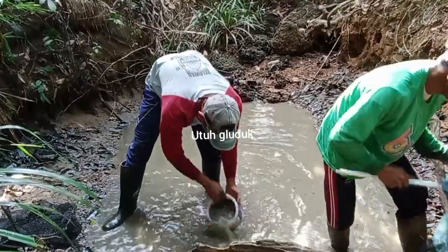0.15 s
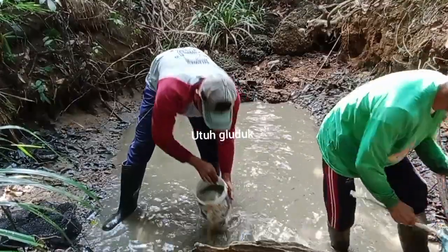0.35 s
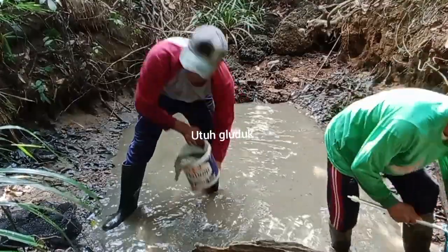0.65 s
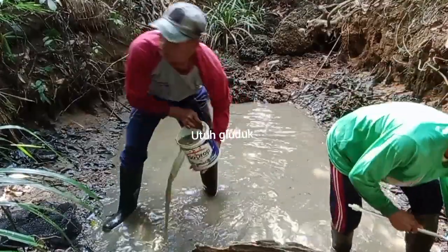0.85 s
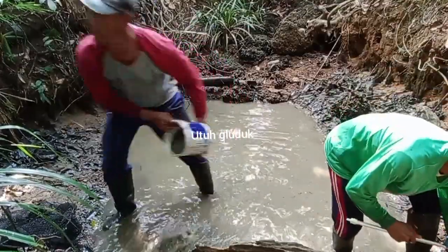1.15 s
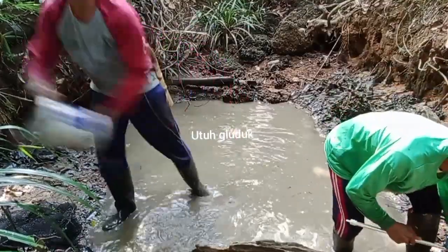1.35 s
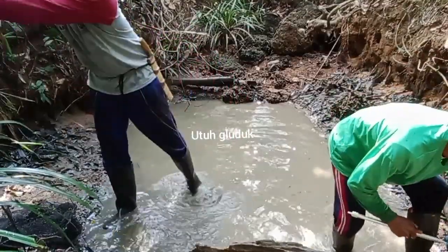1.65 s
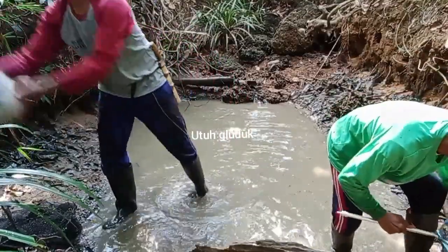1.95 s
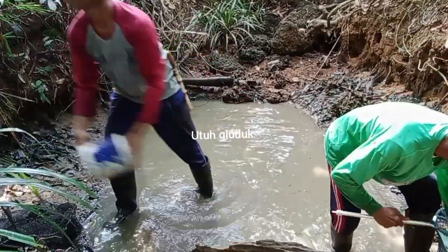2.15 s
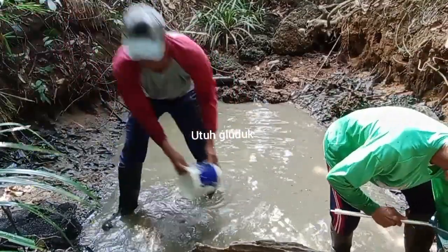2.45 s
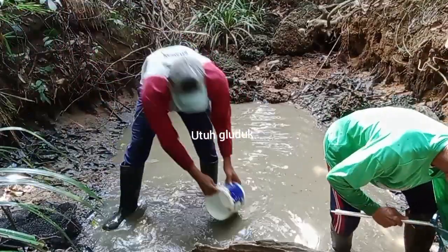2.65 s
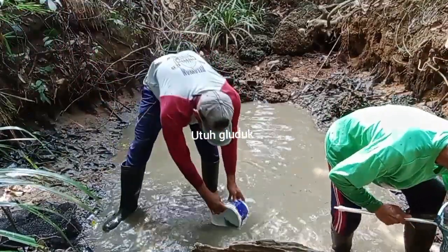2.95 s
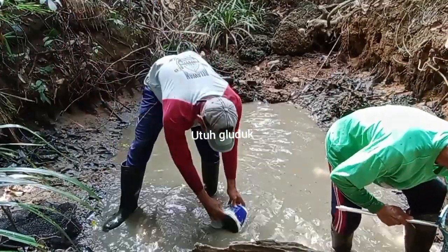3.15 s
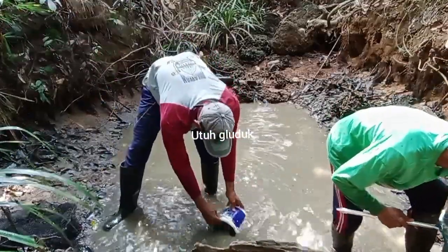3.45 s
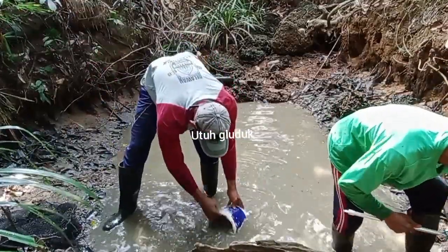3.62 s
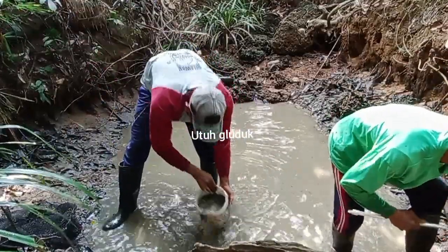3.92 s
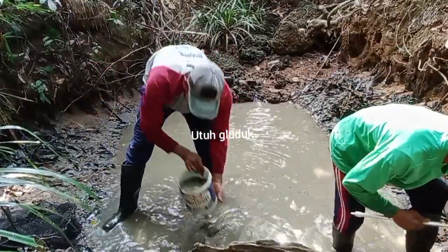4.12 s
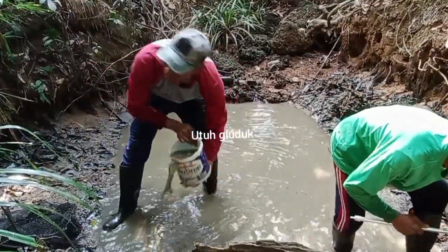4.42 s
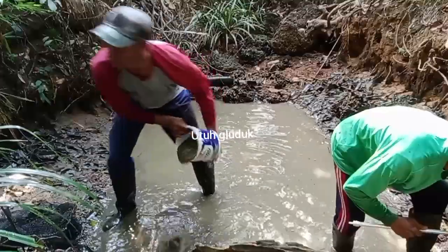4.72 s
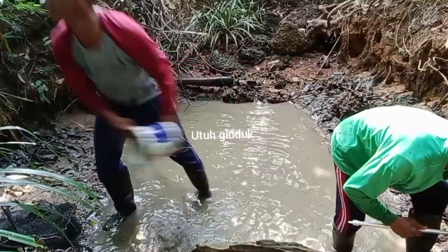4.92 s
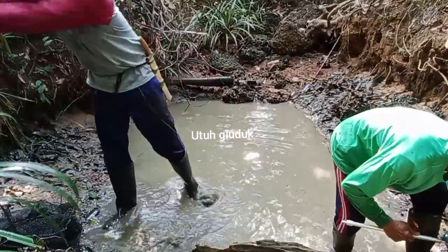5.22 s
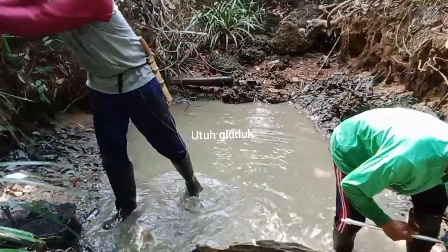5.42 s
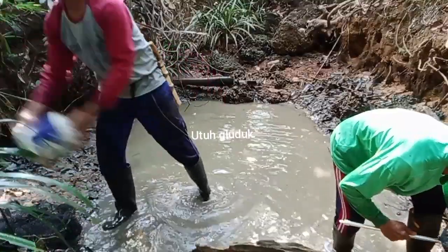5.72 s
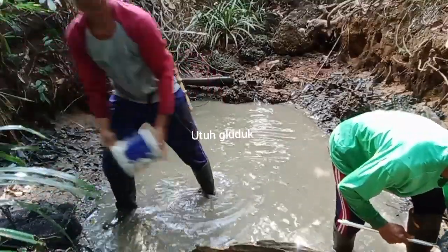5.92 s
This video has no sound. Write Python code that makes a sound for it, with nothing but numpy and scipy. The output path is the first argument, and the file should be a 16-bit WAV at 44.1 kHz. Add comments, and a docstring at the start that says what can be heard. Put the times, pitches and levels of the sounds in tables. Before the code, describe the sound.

Outdoor bailing of a shallow muddy pool: bubbling bucket scoops, dripping spills, a boot's slosh and two sharp, wet throws, ending with a dull plastic knock.

```python
"""In a dry stream bed, muddy water is bailed from a shallow pool with a small plastic bucket.
The bucket gulps air bubbles as it fills, spills and dribbles as it is lifted, and its load is
flung onto the wet bank, twice; a boot washes through the pool before the first throw. Splashes are
bubbles and drop impacts shaped by loudness curves; plops are gliding tones, short impacts are clicks
with noise bursts, and knocks are a few short tones. Insects hiss far off as a narrow band of noise."""
import sys
import numpy as np
from scipy import signal
from scipy.fft import rfft, irfft, next_fast_len
from scipy.io import wavfile
from scipy.ndimage import uniform_filter1d

SR = 44100
rng = np.random.default_rng(int(sys.argv[2]) if len(sys.argv) > 2 else 0)


def master_out(mix):
    """Clip the mix to full scale and print it as 16-bit PCM to the path in sys.argv[1]."""
    frames = np.transpose(np.atleast_2d(mix))
    ceiling = np.clip(frames, -1, 1)
    pcm = np.round(ceiling * 32767).astype(np.int16)
    wavfile.write(sys.argv[1], SR, pcm)


N = 267687
TIME = np.arange(N) / SR  # seconds

# tone of the boot's wash and of the flung water: [f/Hz, level/dB]
SPLASH_TONE = [(47, -26), (80, -15), (161, -10.5), (219, -20), (298, -5.5), (451, -7), (1320, 4.5),
               (2280, 4.5), (6820, -8), (8680, -15), (12300, -25), (13700, -29), (15000, -52)]
# tone of drops hitting the pool: [f/Hz, level/dB]
POOL_TONE = [(88, -66), (150, -16), (486, -3.5), (589, -1.5), (661, -1.5), (1030, -2.5), (1490, 5.5),
             (3030, -3.5), (6550, -14), (8920, -22), (9820, -25.5), (13900, -36), (15000, -70)]


def from_db(db):
    """Turn decibels into a plain gain."""
    return 10 ** (np.asarray(db) / 20)


def rms_one(x):
    """Scale a sound to an average power of one."""
    return x / np.sqrt(np.mean(x ** 2) + 1e-20)


def add(out, s, sound):
    """Mix a short sound in at time s, in seconds."""
    i = int(np.clip(round(s * SR), 0, N - 1))
    out[i:i + len(sound)] += sound[:N - i]


def colour(x, spectrum):
    """Make each pitch region louder or softer, following a table of frequencies and levels."""
    hz, db = np.transpose(spectrum)
    size = next_fast_len(N + 4096)
    bins = np.maximum(np.fft.rfftfreq(size, 1 / SR), 1)
    gain = from_db(np.interp(np.log(bins), np.log(hz), db))
    return irfft(rfft(x, size) * gain, size)[:N]


def band(x, low_hz, high_hz, order=2):
    """Keep mainly the sound between two frequencies."""
    edges = [low_hz, min(high_hz, .45 * SR)]
    sos = signal.butter(order, edges, "band", fs=SR, output="sos")
    return signal.sosfilt(sos, x + 1e-18)


def even(x, span_s):
    """Hold the power near one over span_s, keeping the finer grain."""
    size = max(int(span_s * SR), 2)
    power = np.abs(uniform_filter1d(uniform_filter1d(x ** 2, size), size))
    return x / np.sqrt(power + 1e-4 * np.mean(x ** 2))


def smooth_noise(cutoff_hz, noise):
    """Keep only the slow part of some noise."""
    return signal.sosfilt(signal.butter(2, cutoff_hz, fs=SR, output="sos"), noise)


def waver(rate, depth_db):
    """A gain that wanders at random about 0 dB, slower than about rate in Hz."""
    slow = smooth_noise(rate, rng.standard_normal(N + SR))[SR:]  # skip the filter's start
    return from_db(depth_db * rms_one(slow))


def surge(s, rise_s, hold_s, fade_s):
    """The loudness of a mass of water that arrives, keeps coming for a while and dies away."""
    fade_curve = 1.46  # above 1, the last of the water stops sooner than a plain decay would
    out = np.zeros(N)
    during = (TIME >= s) & (TIME < s + rise_s + hold_s + 10 * fade_s)
    t = TIME[during] - s
    swell = np.sin(np.pi / 2 * np.clip(t / max(rise_s, 1e-3), 0, 1)) ** 2
    fading = np.maximum((t - rise_s - hold_s) / max(fade_s, 1e-3), 0)
    out[during] = swell * np.exp(-fading ** fade_curve)
    return out


def pour(rows, low_fade, high_fade):
    """Low, middle and high gains of a run of surges; lows and highs scale the fade time."""
    power = np.zeros((3, N))
    for s, db, rise_s, hold_s, fade_s, low_db, high_db in rows:
        parts = [(low_db, low_fade), (0, 1), (high_db, high_fade)]
        for part, (part_db, stretch) in enumerate(parts):
            gain = from_db(db + part_db) * surge(s, rise_s, hold_s, fade_s * stretch)
            power[part] += gain ** 2
    return np.sqrt(power)


def bubble(hz, ring_s, rise, swell_s):
    """A trapped air pocket swells, glides by rise octaves per ring_s (up if positive), and dies."""
    t = np.arange(int(2.5 * ring_s * SR) + 2) / SR
    phase = 2 * np.pi * np.cumsum(hz * 2 ** (rise * t / ring_s)) / SR
    loudness = (1 - np.exp(-(t / swell_s) ** 2)) * np.exp(-(t / ring_s) ** 2)
    return np.sin(phase) * loudness


def bubble_cloud(per_s, low_hz, high_hz, cycles, rise=0.046):
    """Bubbles of random size and strength, born at random moments."""
    out = np.zeros(N)
    for when, size, strength, life in rng.random((int(per_s * N / SR), 4)):
        hz = low_hz * (high_hz / low_hz) ** size
        height = hz / high_hz * from_db(13 * strength)
        ring_s = cycles * (.5 + life) / hz
        add(out, when * N / SR, height * bubble(hz, ring_s, rise, swell_s=1 / hz))
    return rms_one(out)


def droplets(per_s, spread_db):
    """Sharp impacts of drops at random moments, with scattered strengths."""
    sizes = from_db(spread_db * np.minimum(rng.exponential(1, N), 4)) * rng.choice([-1, 1], N)
    return rms_one(sizes * (rng.random(N) < per_s / SR))


def forest():
    """Faint outdoor air and a wavering band of distant insects, both filtered noise."""
    # tone of the outdoor air: [f/Hz, level/dB]
    air_tone = [(25, -28), (55, 1), (110, 1), (200, 0.5), (400, -5), (900, -6.5), (1400, -6), (2300, -7.5),
                (4000, -16.5), (6500, -23.5), (8700, -31.5), (10500, -37.5), (14000, -34)]
    air_db, insect_db = -63, -73.5
    insect_hz, width_hz = 7420, 380
    air = from_db(air_db) * rms_one(colour(rng.standard_normal(N), air_tone))
    insects = band(rng.standard_normal(N), insect_hz - width_hz / 2, insect_hz + width_hz / 2)
    return air + from_db(insect_db) * waver(rate=11.0, depth_db=2.5) * rms_one(insects)


def banks(x, t60=0.099, first_s=0.0096):
    """Earth banks and leaves scatter a short, weak echo, which falls 60 dB in t60 seconds."""
    t = TIME[:SR // 2]
    scatter = rng.standard_normal(len(t)) * from_db(-60 * t / t60) * (t > first_s)
    echo = band(scatter, 310, 3100, order=1)
    return from_db(-22) * signal.fftconvolve(x, echo / np.sqrt(np.sum(echo ** 2)))[:N]


def drips():
    """Light drops from bucket and hands tinkle on the pool amid a fine, even spatter."""
    # spells of dripping, levels before the final mix: [t/s, level/dB, length/s]
    spells = [(0.0, -62, 0.46), (0.453, -57.5, 0.075), (1.234, -60.5, 0.034), (2.474, -61, 0.15),
              (2.75, -60, 0.04), (2.958, -62, 0.55), (3.86, -53.5, 0.39), (4.443, -59.5, 0.26),
              (4.845, -53.5, 0.1)]
    rise_s, fade_s = 0.011, 0.21
    bubbles = bubble_cloud(per_s=420, low_hz=893, high_hz=4070, cycles=15.0, rise=0.026)
    grain = bubbles + from_db(6.5) * droplets(per_s=640, spread_db=5.0)
    tinkle = even(band(grain, 950, 3040, order=2), span_s=0.043)
    spatter = even(colour(droplets(per_s=1200, spread_db=2.0), POOL_TONE), span_s=0.025)
    flow = sum(from_db(db) * surge(s, rise_s, length_s, fade_s) for s, db, length_s in spells)
    mix = from_db(-8.0) * tinkle + from_db(-8.5) * spatter
    return flow * waver(rate=31.0, depth_db=3.7) * mix


def plops(swell_share=0.22):
    """Drips, spills, wading boots and the filling bucket release bubbles, which shed smaller ones."""
    # single bubbles: [t/s, f/Hz, peak level/dB, pitch rise/octaves per ring, ring/s]
    single_bubbles = [(0.0, 443, -25.5, 0.084, 0.012), (0.008, 238, -39.5, 0.13, 0.02),
                      (0.049, 481, -35, 0.065, 0.03), (0.085, 670, -34.5, 0.072, 0.013),
                      (0.106, 1398, -38, -0.054, 0.0063), (0.217, 1103, -33, 0.081, 0.015),
                      (0.233, 1300, -40, -0.091, 0.0051), (0.456, 875, -39, -0.014, 0.017),
                      (0.545, 2510, -49, 0.03, 0.0097), (0.62, 1740, -37.5, 0.064, 0.0081),
                      (0.642, 390, -34.5, 0.14, 0.0076), (0.644, 626, -39, -0.0071, 0.02),
                      (0.672, 2120, -40, 0.044, 0.01), (1.034, 2043, -26, 0.042, 0.0081),
                      (1.116, 1410, -35, -0.031, 0.0095), (1.12, 556, -36.5, -0.17, 0.011),
                      (1.128, 337, -37.5, 0.28, 0.0096), (1.13, 2100, -31, -0.19, 0.0069),
                      (1.148, 1000, -28, 0.0097, 0.0094), (1.217, 906, -36.5, -0.027, 0.012),
                      (1.314, 1600, -48, -0.028, 0.0063), (1.463, 2020, -49, -0.11, 0.013),
                      (1.528, 695, -33, 0.091, 0.0078), (1.57, 345, -45.5, -0.058, 0.019),
                      (1.595, 320, -45, -0.074, 0.014), (2.519, 1332, -46.5, 0.053, 0.014),
                      (2.82, 371, -34, 0.049, 0.027), (2.817, 2390, -37, 0.053, 0.0081),
                      (3.086, 1610, -46, -0.0057, 0.0094), (3.091, 2425, -42, 0.063, 0.0081),
                      (3.185, 257, -46.5, -0.14, .025), (3.42, 349, -41, -0.0019, 0.022),
                      (3.467, 800, -41.5, -0.27, 0.014), (3.513, 1150, -39.5, -0.021, 0.015),
                      (3.518, 400, -35, 0.035, 0.013), (3.565, 1149, -37, -.05, .007),
                      (3.564, 413, -31.5, -0.039, 0.0084), (3.57, 187, -37, 0.019, 0.04),
                      (3.578, 453, -34.5, 0.014, 0.01), (3.581, 946, -40.5, -0.046, 0.022),
                      (3.618, 268, -39, 0.028, 0.016), (3.611, 3090, -42, -0.077, 0.011),
                      (3.67, 385, -33, -0.013, 0.025), (3.675, 580, -34.5, 0, 0.0079),
                      (3.712, 422, -35.5, 0.23, 0.035), (3.728, 600, -32, -0.063, 0.0067),
                      (3.749, 630, -27.5, 0.13, 0.008), (3.758, 234, -39.5, 0.074, 0.02),
                      (3.76, 659, -30, -0.11, 0.02), (3.778, 603, -31, 0.0055, 0.018),
                      (3.901, 1020, -46, -0.12, 0.011), (3.924, 960, -45.5, 0.099, 0.008),
                      (4.013, 1786, -46.5, -0.0035, 0.021), (4.145, 544, -45, 0.087, 0.022),
                      (4.192, 1760, -44.5, 0.016, .009), (4.21, 1530, -44, 0.0051, .007),
                      (4.213, 3970, -41, -0.034, 0.011), (4.233, 1340, -40, 0.016, 0.0093),
                      (4.268, 1690, -45, 0.081, 0.0078), (4.356, 1360, -46, -.02, 0.014),
                      (4.491, 840, -39, 0.27, 0.024), (4.711, 1357, -46, 0.036, 0.016),
                      (4.749, 396, -28, 0.22, 0.011), (4.748, 1000, -29.5, -0.1, 0.0032),
                      (4.754, 1930, -27.5, -0.0037, 0.0054), (4.762, 980, -25.5, -0.0058, 0.0066),
                      (4.771, 920, -27.5, -0.12, 0.0065), (4.771, 3330, -37.5, 0.074, 0.007),
                      (4.802, 773, -37.5, 0.036, 0.013), (4.807, 1042, -38, .03, 0.0096),
                      (4.819, 1025, -32, 0.079, 0.013), (4.824, 2150, -37, 0.029, 0.0063),
                      (4.827, 1630, -35.5, -0.057, 0.01), (4.834, 1110, -34, .03, 0.0062),
                      (4.941, 2600, -42.5, -0.0038, 0.0057), (5.111, 793, -38, 0.053, 0.018),
                      (5.115, 1790, -27.5, -0.093, 0.016), (5.172, 1390, -32, 0.05, 0.0064),
                      (5.208, 3063, -38, 0.021, 0.0043), (5.225, 2520, -31, -0.19, 0.006),
                      (5.233, 518, -30, .38, 0.023), (5.263, 787, -32, 0.074, 0.01),
                      (5.533, 467, -40, 0.48, 0.036)]
    # the shed bubbles: level, greatest delay in seconds, greatest pitch above the plop in octaves
    shed_db, shed_s, shed_octaves = -56, 0.045, 0.704
    out = np.zeros(N)
    chances = rng.random((len(single_bubbles), 4, 2))
    for (s, hz, db, rise, ring_s), shed in zip(single_bubbles, chances):
        ring = bubble(hz, ring_s, rise, swell_share * ring_s)
        add(out, s, from_db(db) * ring / np.abs(ring).max())
        for late, size in shed:
            small_hz = hz * 2 ** (shed_octaves * size)
            small = bubble(small_hz, ring_s / 2, rise / 2, swell_share * ring_s / 2)
            add(out, s + late * shed_s, from_db(shed_db) * small)
    return out * waver(rate=122, depth_db=0.2)  # a slight wobble


def short_impacts(attack_s=0.00197, click_db=-5):
    """Slaps of water, ticks of small drops and light bucket contacts: a click and a noise burst each."""
    # impacts: [t/s, burst peak level/dB, centre f/Hz, width/octaves, fade/s]
    impacts = [(0.062, -35, 1470, 0.8, 0.02), (0.152, -52, 1200, 0.41, 0.02),
               (0.232, -44, 1280, 0.48, 0.033), (0.365, -41.5, 3680, 0.36, 0.021),
               (0.409, -46.5, 8050, 0.76, 0.0045), (0.609, -50, 2470, 0.68, 0.018),
               (0.645, -51, 4200, 1.1, 0.014), (0.674, -55, 6900, 0.75, 0.004),
               (0.69, -38, 2620, 0.94, 0.014), (0.751, -52.5, 4940, 1.03, 0.0063),
               (1.03, -46.5, 1150, 0.63, 0.0089), (1.038, -43, 2180, 1.4, 0.006),
               (1.078, -46, 1160, 1.2, 0.013), (1.089, -40, 3670, 0.27, 0.0046),
               (1.142, -22, 840, 1.3, 0.005), (1.311, -43.5, 2220, 1.9, 0.0054),
               (1.419, -39.5, 3280, 1.1, 0.02), (1.46, -44, 4900, 0.7, 0.012),
               (1.527, -37, 770, 1.9, 0.0052), (1.57, -42, 1300, 0.91, 0.026),
               (1.646, -45, 2200, 1.2, 0.02), (1.676, -39, 2400, 2.1, 0.029),
               (1.723, -22, 2080, 1.1, 0.013), (1.737, -20.5, 2860, 2.4, 0.011),
               (1.856, -32.5, 2330, 2, 0.019), (1.917, -32.5, 2420, 1.5, 0.046),
               (2.106, -26.5, 2000, 1.7, 0.014), (2.143, -24.5, 1140, 1.44, 0.02),
               (2.168, -22.5, 1700, 1.2, 0.015), (2.243, -22.5, 1120, 0.74, 0.0023),
               (2.272, -24, 2000, 1.7, 0.02), (2.46, -49, 413, 0.59, 0.018),
               (2.474, -46, 7000, 0.86, 0.0013), (2.815, -36.5, 2340, 2.88, 0.013),
               (2.993, -45, 1370, 0.77, 0.023), (3.049, -52, 4460, 0.22, 0.0088),
               (3.092, -46, 2040, 0.76, 0.024), (3.492, -44, 3350, 0.44, 0.012),
               (3.515, -37, 294, 1.2, 0.017), (3.566, -39, 800, 4.6, 0.0048),
               (3.582, -37, 1990, 0.8, 0.0065), (3.754, -27.5, 3690, 0.49, 0.0036),
               (3.903, -40.5, 1340, 1.3, 0.016), (3.922, -44.5, 1700, 2.2, 0.015),
               (3.944, -48, 2900, 0.24, 0.025), (4.013, -39.5, 2260, 0.62, 0.012),
               (4.063, -46.5, 2830, 0.78, 0.018), (4.095, -45.5, 2000, .8, 0.013),
               (4.125, -46.5, 3080, 0.41, 0.013), (4.147, -44, 2480, 2.1, 0.0081),
               (4.207, -35.5, 3100, 1, 0.012), (4.208, -43, 690, 0.58, 0.017),
               (4.225, -53, 3970, 0.17, 0.045), (4.268, -44.5, 2480, 1.1, 0.045),
               (4.324, -50, 2580, 0.71, 0.009), (4.673, -43.5, 2700, 1.4, .007),
               (4.954, -42.5, 2480, 0.36, 0.02), (4.993, -57, 10000, 1.2, 0.004),
               (5.062, -37.5, 3260, 1.1, 0.012), (5.185, -31, 5500, 1.6, 0.0046),
               (5.292, -23.5, 2700, 0.72, .005), (5.325, -19, 1830, 1.6, 0.012),
               (5.358, -17.5, 2110, 1.8, 0.0087), (5.58, -37, 3000, 0.41, 0.01),
               (5.71, -32, 1920, 0.83, .012), (5.734, -33, 1700, 0.98, 0.0096),
               (5.802, -27.5, 2230, 0.89, 0.031), (5.915, -30, 2500, 2.8, 0.004),
               (5.923, -40.5, 235, 0.94, 0.022)]
    out, t = np.zeros(N), TIME[:SR // 5]
    for s, db, hz, octaves, fade_s in impacts:
        edge = 2 ** (octaves / 2)
        click = band(signal.unit_impulse(len(t)), hz / edge, hz * edge)
        noise = band(rng.standard_normal(len(t)), hz / edge, hz * edge, order=3)
        # the burst swells briefly, then fades
        swell_and_fade = (1 - np.exp(-(t / attack_s) ** 2)) * np.exp(-t / fade_s)
        burst = even(noise, span_s=0.017) * swell_and_fade
        add(out, s, from_db(db + click_db) * click / np.abs(click).max())
        add(out, s - attack_s / 2, from_db(db) * burst / np.abs(burst).max())
    return out


def knock():
    """A dull blow and its rebound on the emptied bucket's plastic wall, too small to radiate bass."""
    # tones of the soft wall, before the bass is cut: [f/Hz, level/dB, time to fall 60 dB/s]
    wall_tones = [(715, -6, .012), (1035, 3, 0.014), (1190, 12, 0.0045), (1900, -20, .008)]
    # blow and rebound: [t/s, peak level/dB]
    blows = [(5.795, -13), (5.804, -21)]
    out, t = np.zeros(N), TIME[:SR // 10]
    tones = sum(from_db(db - 60 * t / t60) * np.sin(2 * np.pi * hz * t) for hz, db, t60 in wall_tones)
    ring = band(tones, 700, 2200)
    for s, db in blows:
        add(out, s, from_db(db) * ring / np.abs(ring).max())
    return out


def hollow(width_hz=85):
    """The air in the bucket, stirred by the water, hums as narrow noise that can glide in pitch."""
    # hums: [t/s, level/dB, rise/s, hold/s, fade/s, start f/Hz, glide/(Hz per s)]
    hums = [(0.338, -52.5, 0.018, 0.036, 0.015, 616, -6), (0.504, -58.5, 0.075, 0.06, 0.018, 616, -4),
            (0.678, -46, 0.018, 0.0044, 0.0058, 645, 0), (1.084, -45, 0.02, 0.013, 0.01, 1000, -7500),
            (1.172, -43.5, 0.018, 0.026, 0.022, 585, 2903), (1.598, -52.5, 0.057, 0.033, 0.015, 657, 1300),
            (3.152, -51.5, 0.026, 0.011, 0.032, 308, -500), (3.287, -55, 0.011, 0.21, 0.036, 321.6, 196)]
    stir = smooth_noise(width_hz / 2, rng.standard_normal((2, N)))
    out = np.zeros(N)
    for s, db, rise_s, hold_s, fade_s, hz, glide in hums:
        pitch = hz + glide * np.clip(TIME - s, 0, rise_s + hold_s + fade_s)
        phase = 2 * np.pi * np.cumsum(pitch) / SR
        hum = even(stir[0] * np.sin(phase) + stir[1] * np.cos(phase), span_s=0.024)
        out += from_db(db) * surge(s, rise_s, hold_s, fade_s) * hum
    return out


def spills():
    """Water falling into the pool drags air under: dense bubbles and drops beneath a fine spray."""
    # water spilling from the rim, levels before the final mix: [t/s, small-bubble level/dB, rise/s,
    # hold/s, fade/s, large bubbles relative to small/dB, spray relative to small/dB]
    rim_spills = [(0.345, -55, 0.011, 0.051, 0.029, -18, -0.5), (0.57, -52, 0.041, 0.083, 0.013, -21, -15),
                  (0.64, -60, 0.0063, 0.0091, 0.027, 0, 2.5), (1.074, -46.5, 0.015, 0.0089, 0.029, -18, -3),
                  (1.098, -37.5, 0.035, 0.014, 0.032, 4, -11.5),
                  (1.15, -43, 0.019, 0.06, 0.036, -1.5, -6.5), (4.668, -55.5, 0.0096, 0.18, .02, -29, -2.5),
                  (4.746, -39, 0.0097, 0.024, 0.025, -12, -6.5),
                  (4.795, -44.5, 0.027, 0.012, 0.022, -0.5, -7.5),
                  (5.052, -53, 0.0086, .003, 0.18, -5, 0.5), (5.111, -34, 0.021, 0.03, 0.036, -9, -7),
                  (5.14, -36.5, 0.041, 0.061, 0.013, -1, -1.5)]
    cloud = bubble_cloud(per_s=1300, low_hz=400, high_hz=3600, cycles=7)
    splash = colour(from_db(-6) * cloud + droplets(per_s=12000, spread_db=1.5), POOL_TONE)
    low, middle, high = pour(rim_spills, low_fade=0.89, high_fade=1.1)
    large = low * even(band(splash, 207, 1080, order=3), span_s=0.0054)
    small = middle * even(band(splash, 820, 3440, order=4), span_s=0.0031)
    spray = high * even(band(splash, 3730, 14000, order=4), span_s=0.011)
    clumps = waver(rate=32, depth_db=1.0)
    return clumps * (from_db(-2.5) * large + from_db(-0.07) * small + from_db(-2.0) * spray)


def gulp_hz(s):
    """Gulps get smaller as the bucket fills, so their pitch climbs ever faster until it is full."""
    # moments at which the bucket is full: [t/s]
    full_at = [0.128, 3.81]
    empty_hz, full_hz, fill_s = 348, 630, 0.11
    full_s = min(full_at, key=lambda moment: abs(moment - s))  # the nearest one counts
    return empty_hz + (full_hz - empty_hz) * np.exp(min(s - full_s, 0) / fill_s)


def cavity(x, width_hz=140):
    """Sound made inside the bucket is lifted at the higher resonances of its air."""
    # resonances: [f/Hz, level of the added band/dB]
    resonances = [(1140, -8), (1480, 0), (2160, -8.5), (3050, 2)]
    lifts = (from_db(db) * band(x, hz - width_hz / 2, hz + width_hz / 2, order=1)
             for hz, db in resonances)
    return x + sum(lifts)


def scoops(per_s=330, octaves=0.422, cycles=3.2):
    """Air leaves the dipped bucket in big gulps, while dense froth rings inside it."""
    # surges into the bucket, levels before the final mix: [t/s, froth level/dB, rise/s, hold/s,
    # fade/s, gulps relative to froth/dB, spray relative to froth/dB]
    surges = [(0.0, -40.5, 0.00081, 0.0051, 0.027, 5, -18), (0.036, -47, 0.0035, 0.028, 0.096, 1, -17),
              (3.36, -53, 0.088, 0.04, 0.033, -11, -12.5), (3.494, -46, 0.015, 0.014, 0.051, -1, -10.5),
              (3.562, -45, 0.0068, 0.031, 0.04, -4, -12.5), (3.625, -43, 0.024, 0.078, 0.083, 3.5, -15),
              (3.75, -48.5, 0.0027, 0.0042, 0.016, -3, 3.5)]
    # tone of the froth: [f/Hz, level/dB]
    froth_tone = [(350, -30), (600, 14), (875, 3.5), (1360, -10), (2710, -19), (3100, -20.5), (6420, -27.5),
                  (8750, -37), (15000, -60)]
    bubbles = bubble_cloud(per_s=900, low_hz=814, high_hz=3550, cycles=10)
    grain = from_db(-5) * bubbles + droplets(per_s=7000, spread_db=2.0)
    froth = cavity(colour(grain, froth_tone))
    gulps = np.zeros(N)
    for when, size in rng.random((int(per_s * N / SR), 2)):
        s = when * N / SR
        # pitches scatter in a bell around the pitch of the moment
        bell = .5 * np.log((size + .02) / (1.02 - size))
        hz = gulp_hz(s) * 2 ** (octaves * bell)
        add(gulps, s, bubble(hz, cycles / hz, rise=0.22, swell_s=1 / hz))
    low, middle, high = pour(surges, low_fade=1.0, high_fade=1.12)
    gulping = low * even(gulps, span_s=0.0092)
    frothing = middle * even(band(froth, 1080, 2400, order=4), span_s=0.012)
    spray = high * even(band(froth, 3060, 16500, order=4), span_s=0.0048)
    return from_db(1.5) * gulping + from_db(-2.0) * frothing + from_db(3.5) * spray


def crackle(per_s=70, ring_s=0.00083):
    """Single fat drops snap sharply out of the spray, as very short bursts of noise."""
    hits = (rng.random(N) < per_s / SR) * rng.uniform(.3, 1, N)
    fading = signal.fftconvolve(hits, np.exp(-TIME[:SR // 50] / ring_s))[:N]
    snaps = fading * rng.standard_normal(N)
    return rms_one(band(colour(snaps, SPLASH_TONE), 2500, 15000))


def splashes():
    """First a boot's wash in the pool, then flung water on the bank: drop impacts with some bubbles."""
    # splashing water, first the boot's wash, then the throws; levels before the final mix:
    # [t/s, splatter level/dB, rise/s, hold/s, fade/s, thud relative to splatter/dB,
    # spray relative to splatter/dB]
    splash_surges = [(1.521, -45, 0.0069, 0.003, 0.026, -0.5, -4.5),
                     (1.53, -55.5, 0.14, 0.089, 0.097, 3, -2.5),
                     (1.704, -36.5, 0.016, 0.018, 0.039, -10, -1.5),
                     (1.76, -48.5, .03, 0.048, 0.11, -7.5, 1), (1.912, -48.5, 0.01, 0.074, 0.14, -8, -2),
                     (2.055, -34.5, 0.054, 0.18, 0.064, -12, -6.5),
                     (2.335, -45, 0.033, 0.028, 0.056, -11.5, -2.5),
                     (5.258, -33, 0.012, .11, 0.035, -10, -3), (5.343, -28, 0.0071, 0.0094, 0.019, -13, -8),
                     (5.40, -47.5, 0.017, 0.05, 0.072, -5.5, -7.5), (5.51, -50, 0.01, 0.11, 0.07, -7.5, -5),
                     (5.65, -47, 0.037, 0.062, 0.055, -22, -14),
                     (5.70, -41.5, 0.018, 0.048, 0.038, -11.5, -10),
                     (5.745, -39.5, 0.085, 0.15, 0.075, -9, -3.5)]
    bubbles = bubble_cloud(per_s=1300, low_hz=352.7, high_hz=4900, cycles=8.1)
    grain = droplets(per_s=6000, spread_db=4.0) + from_db(-10.0) * bubbles
    splash = colour(grain, SPLASH_TONE)
    low, middle, high = pour(splash_surges, low_fade=0.8, high_fade=1.32)
    thud = low * even(band(splash, 49, 560, order=3), span_s=0.009)
    splatter = middle * even(band(splash, 706, 3740, order=4), span_s=0.0075)
    fine_drops = colour(droplets(per_s=7600, spread_db=-1.5), SPLASH_TONE)
    mist = high * even(band(fine_drops, 3460, 19845, order=4), span_s=0.01)
    spray = from_db(0.5) * mist + from_db(-8.5) * high * crackle()
    # the heavy water arrives in clumps, the spray more evenly
    heavy = from_db(-2.0) * thud + from_db(-1.55) * splatter
    return waver(rate=16, depth_db=1.64) * heavy + waver(rate=15, depth_db=1.3) * spray


def scene():
    """All the water and bucket sounds, their echo and the forest, alike in both channels."""
    near = splashes() + spills() + scoops() + hollow() + drips() + plops() + short_impacts() + knock()
    return np.tile(near + banks(near) + forest(), (2, 1))


def record(dry):
    """A small microphone with an uneven treble; the very top is cut."""
    # colour of the microphone: [f/Hz, level/dB]
    microphone = [(5500, -0.5), (6900, -2.5), (8000, 6), (8900, 13.5), (9900, -1), (11650, 2.5),
                  (12300, -13), (13700, 2), (14200, -3), (14700, -31)]
    cutoff_hz = 15400
    heard = np.array([colour(channel, microphone) for channel in dry])
    return signal.sosfilt(signal.cheby2(14, 60, cutoff_hz, fs=SR, output="sos"), heard)


dry = scene()
out = record(dry)
master_out(out)
```